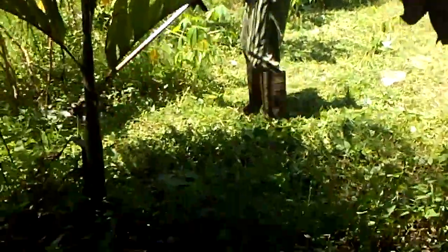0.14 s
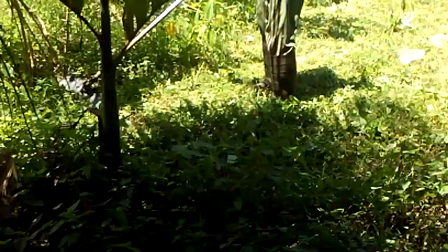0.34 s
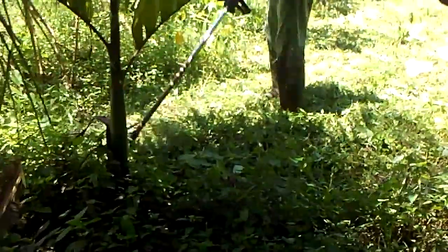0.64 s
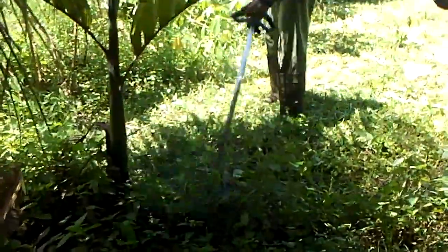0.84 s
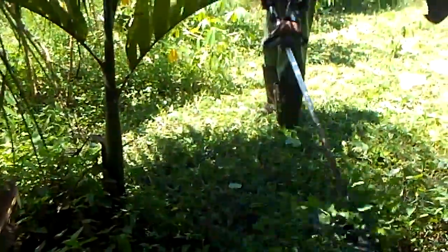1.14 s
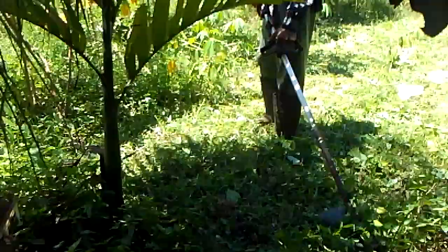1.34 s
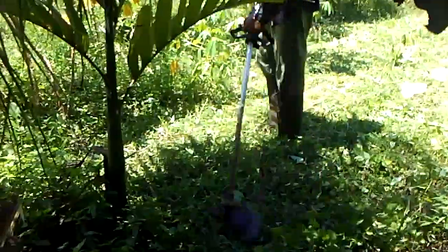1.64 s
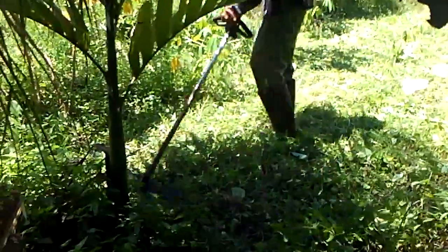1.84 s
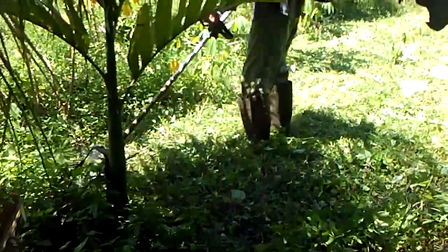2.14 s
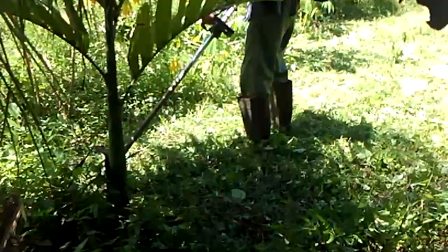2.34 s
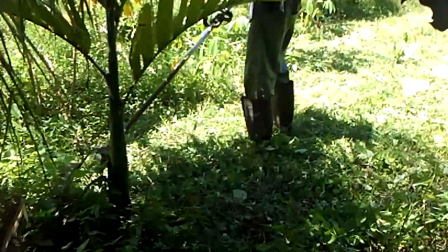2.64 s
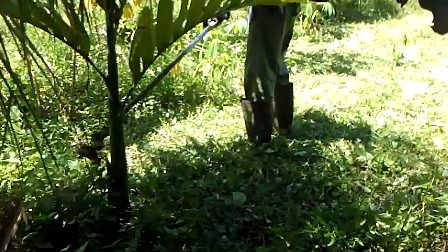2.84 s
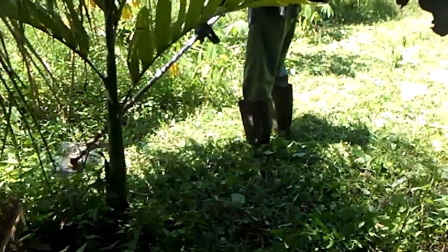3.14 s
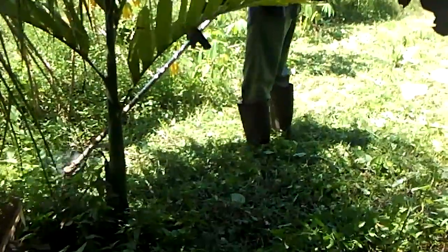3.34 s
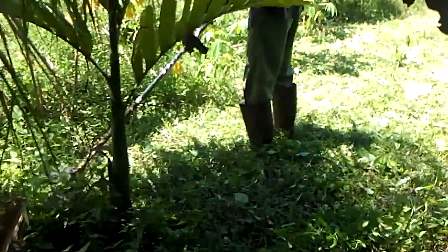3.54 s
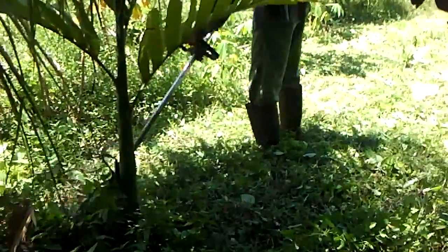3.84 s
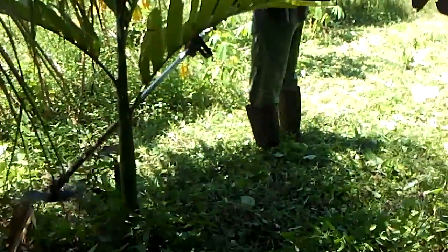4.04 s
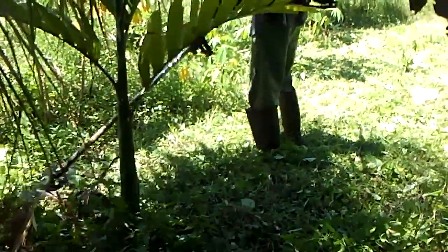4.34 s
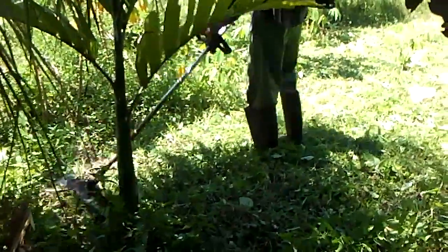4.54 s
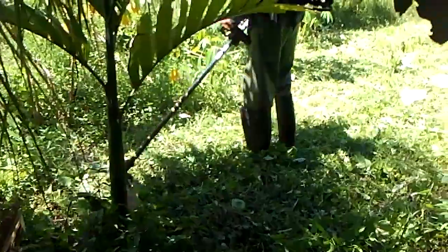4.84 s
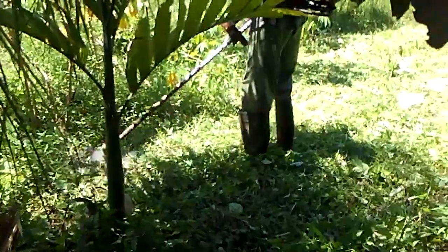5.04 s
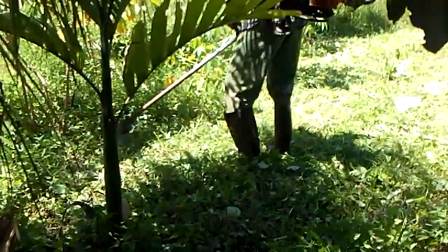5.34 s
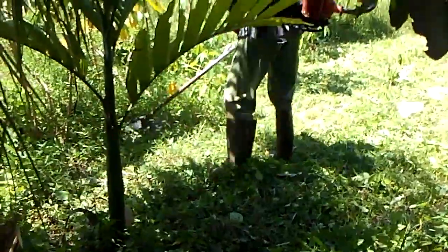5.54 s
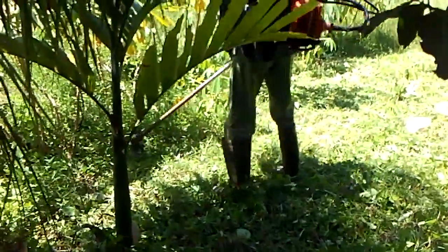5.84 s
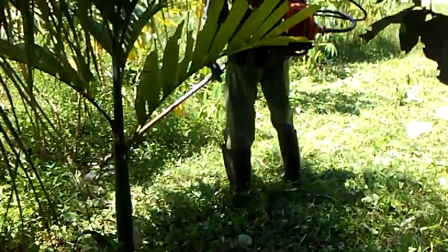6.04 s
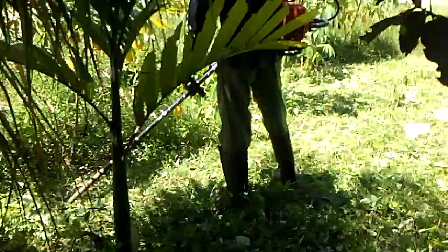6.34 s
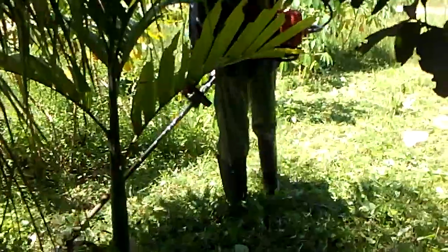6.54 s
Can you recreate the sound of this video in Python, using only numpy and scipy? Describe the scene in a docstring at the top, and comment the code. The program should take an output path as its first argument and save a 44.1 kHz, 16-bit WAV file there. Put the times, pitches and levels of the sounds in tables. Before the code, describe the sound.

A two-stroke petrol brush cutter runs throughout at part throttle, outdoors among weeds, a few metres from the microphone. The engine dominates with a buzzing, uneven putter, a raspy exhaust and a rattling casing. Beneath it the blade whirrs, shreds leaves and swishes through long grass with a faint steel ring. The pitch climbs slightly at first, then sags from about 1 to 1.8 seconds as a thick clump sets the blade ringing. The engine recovers, then falters briefly as the blade cracks into stalks at about 2.8 seconds. A smaller crack follows at 3.5 seconds, and a splintering cluster with a metallic ping and another stumble at 4 seconds. The engine labours at a lower pitch, with light pings around 4.5 and 5.2 seconds. It speeds up from about 5.7 seconds, shreds more leaves, and dips slightly at 6.5 seconds.

```python
"""Outdoors in weeds, one microphone a few metres from a two-stroke brush cutter. It opens at part
throttle, skipping every other firing; each turn puffs through the muffler and rattles the casing while
the blade whirrs and shreds leaves. After a second a thick clump sets the steel ringing, and the loaded
engine fires more often and unevenly. From about three to four seconds the blade hacks into stalks and
the engine falters. It labours on through thinner growth, then speeds up near the end."""
import sys
import numpy as np
from scipy import signal
from scipy.fft import rfft, irfft, next_fast_len
from scipy.io import wavfile
from scipy.ndimage import uniform_filter1d

SR = 44100
rng = np.random.default_rng(int(sys.argv[2]) if len(sys.argv) > 2 else 0)


def dump_mix(stems):
    """Bounce the given channels to the path in sys.argv[1] as a 16-bit WAV at rate SR."""
    frames = np.atleast_2d(stems).T  # one column per channel
    limited = np.clip(frames, -1, 1)  # hard clip at full scale
    pcm = np.round(limited * 32767).astype(np.int16)
    wavfile.write(sys.argv[1], SR, pcm)


N = 294588

# crank speed: t/s, speed/(turns/s)
CRANK_SPEED = [(0.0, 77.86), (0.04, 82.04), (0.16, 82.46), (0.2, 84.27), (0.36, 83.63), (0.48, 86.64),
               (0.64, 87.52), (0.8, 83.32), (1.04, 80.22), (1.08, 80.07), (1.28, 74.83), (1.44, 76.57),
               (1.68, 76.63), (1.72, 74.6), (1.92, 78.19), (2.08, 79.94), (2.2, 78.71), (2.4, 82.97),
               (2.44, 82.18), (2.6, 81.66), (2.64, 83.14), (2.76, 84.8), (2.84, 84.78), (2.96, 80.13),
               (3.04, 79.78), (3.2, 83.42), (3.32, 82.14), (3.52, 82.02), (3.64, 79.19), (3.84, 73.72),
               (3.88, 76.35), (4.0, 73.59), (4.04, 74.73), (4.08, 72.44), (4.16, 74.66), (4.44, 75.2),
               (4.56, 73.24), (4.6, 74.16), (4.68, 71.99), (4.92, 76.28), (5.08, 75.37), (5.2, 76.34),
               (5.32, 75.74), (5.36, 77.77), (5.56, 76.76), (5.72, 78.12), (5.84, 81.15), (6.0, 84.27),
               (6.08, 85.15), (6.2, 84.33), (6.24, 86.1), (6.4, 86.22), (6.52, 81.65), (6.68, 79.82)]
# firing rhythm, each stretch opening with a skip: t/s, skip spacing/turns
FIRING_RHYTHM = [(0.015, 3), (0.052, 2), (0.458, 3), (0.493, 5), (0.55, 2), (0.573, 4), (0.619, 3),
                 (0.653, 2), (0.676, 3), (0.711, 2), (0.758, 3), (0.867, 6), (0.94, 3), (1.051, 2),
                 (1.076, 3), (1.152, 2), (1.178, 3), (1.217, 4), (1.27, 3), (1.31, 6), (1.389, 2),
                 (1.415, 3), (1.455, 5), (1.52, 2), (1.572, 3), (1.65, 6), (1.73, 2), (1.835, 3),
                 (1.874, 2), (2.002, 3), (2.077, 2), (2.102, 3), (2.178, 2), (2.328, 3), (2.364, 2),
                 (2.413, 3), (2.522, 2), (2.571, 3), (2.608, 2), (2.751, 3), (2.787, 2), (2.81, 5),
                 (2.87, 3), (2.906, 2), (2.93, 3), (2.968, 2), (3.141, 3), (3.178, 2), (3.25, 3),
                 (3.286, 5), (3.347, 3), (3.384, 4), (3.432, 5), (3.493, 9), (3.604, 2), (3.629, 4),
                 (3.68, 2), (3.706, 8), (3.812, 3), (3.852, 2), (3.878, 3), (3.918, 6), (3.998, 2),
                 (4.053, 4), (4.107, 2), (4.188, 4), (4.241, 2), (4.268, 3), (4.308, 2), (4.362, 3),
                 (4.402, 2), (4.428, 3), (4.509, 6), (4.59, 2), (4.617, 5), (4.686, 2), (4.822, 5),
                 (4.889, 2), (5.231, 3), (5.271, 2), (6.03, 3), (6.065, 2), (6.112, 3), (6.183, 2),
                 (6.206, 3), (6.242, 2), (6.265, 4), (6.311, 2), (6.381, 3), (6.451, 2), (6.499, 6),
                 (6.573, 5)]
# hard firings of a rich charge: t/s, extra force/dB
RICH_FIRINGS = [(.545, 3.5), (.788, 1.5), (2.48, 1.5), (2.926, 3.5), (3.173, 3), (3.49, 4.5), (3.622, 0),
                (3.70, 4.5), (3.872, -1.5), (4.183, 7), (4.357, 4), (6.41, 4)]
# exhaust at the microphone as the operator turns: t/s, relative boom level/dB, bark level/dB
EXHAUST_LEVELS = [(0.0, -32, -24), (0.61, -29.5, -20), (0.89, -31, -23), (1.46, -24.5, -21),
                  (1.81, -26.5, -23), (1.96, -27, -21), (2.6, -30, -21), (3.5, -27.5, -21),
                  (3.86, -25.5, -21.5), (4.57, -23, -18.5), (4.68, -24.5, -20), (6.21, -26, -18),
                  (6.68, -27.5, -23)]
# fired against unfired turns, from smooth buzz to hard putter: t/s, contrast factor
PUTTER_CONTRAST = [(0, 1.4), (.9, 1.3), (1.2, 0.91), (1.45, .35), (1.72, 1), (1.95, 1.3), (2.7, 0.97),
                   (3.8, 0.75), (4.4, 0.76), (4.9, .9), (5.3, 1.1), (6.0, 0.59), (6.68, 0.61)]
# muffler response: f/Hz, gain/dB
MUFFLER_RESPONSE = [(85, -37), (150, -20), (258, -15.5), (292, -0.5), (335, 0.5), (380, 2), (455, -0.5),
                    (520, -4.5), (620, -3), (700, 0), (770, 1), (850, 1.5), (920, 3.5), (1000, -1.5),
                    (1100, -22), (1500, -31)]
# four crank speeds, laboured to racing: speed/(turns/s)
TUNING_SPEEDS = [74, 77, 82, 86]
# harmonics the muffler favours: engine order, relative level/dB at each of those speeds
ORDER_LEVELS = [(2, -31, -31, -31.5, -30.5), (3, -26.5, -27, -23.5, -23.5), (4, -17, -16, -15.5, -10.5),
                (5, -4.5, -4, -3, -3.5), (6, -6.5, -7, -9, -17.5), (7, -26, -18.5, -17.5, -14),
                (8, -26, -18, -23.5, -21.5), (9, -18, -14, -11, -5.5), (10, -11.5, -7.5, -2.5, -4.5),
                (11, -9.5, -8.5, -8, -17.5), (12, -6, -7, -12, -17), (13, -20.5, -12.5, -26.5, -23)]
# exhaust tone as the operator turns: t/s, gain between boom and bark/dB, gain at boom's lower edge/dB
FACING_GAINS = [(0, 7.5, -2.5), (.8, 2.5, -0.5), (1.5, 2, -3.5), (2.499, 2.5, -2), (4.5, 2, 0.5),
                (5.399, -5.5, -5.5), (5.7, -11, -1), (6.1, -7, 3.5), (6.68, -6, 5)]
# those two bands: low f/Hz, high f/Hz
FACING_BANDS = [(545, 700), (255, 325)]
# clatter, loudest with the engine facing the microphone: t/s, piston slap/dB, port knock/dB
CLATTER_LEVELS = [(0, -45, -41.5), (.3, -41.5, -36), (.55, -39, -49), (.85, -37, -45), (1.5, -35.5, -31.5),
                  (1.95, -38.5, -44.5), (2.65, -39.5, -41), (3.3, -40, -42), (3.7, -39, -43),
                  (4.3, -35.5, -50.5), (4.85, -40.5, -46.5), (5.3, -38, -47), (5.65, -41, -35),
                  (6, -32.5, -37), (6.35, -33, -40), (6.68, -41.5, -51)]
# casing modes under the piston's slap: f/Hz, width/Hz, relative level/dB
CASING_MODES = [(1310, 230, -1.5), (1593, 170, 4), (1737, 150, -1), (2010, 320, -8)]
# turbulent gas at the tailpipe: f/Hz, gain/dB
RASP_SPECTRUM = [(250, -9.5), (400, -3), (850, 1.5), (1150, 5.5), (1550, 0), (2000, -4), (2600, -11.5),
                 (3400, -17.5), (4300, -32), (5000, -40)]
# air stirred by the blade, loudest as it swings nearest the microphone: t/s, level/dB
WHIRR_LEVEL = [(0, -42), (.9, -43), (1.1, -37.5), (1.5, -36), (1.9, -42), (2.8, -42.5), (4, -42),
               (5.5, -50), (6.1, -41), (6.68, -41.5)]
# that stirred air: f/Hz, gain/dB
WHIRR_SPECTRUM = [(25, -29), (60, -28.5), (95, -13.5), (135, -2.5), (170, -2), (240, -6.5), (400, 0),
                  (800, -36)]
# growth the blade is taking, heard as flying clippings: t/s, relative level/dB
FEED_LEVEL = [(0.0, -57.5), (0.21, -69), (1.77, -59), (1.98, -68), (2.99, -71), (4.06, -65), (4.21, -75),
              (4.72, -72), (5.01, -77), (5.6, -70.5), (5.9, -68.5), (6.27, -61.5), (6.68, -68)]
# bites into clumps: t/s, length/s, extra shredding/dB, extra ring/dB
CLUMP_BITES = [(.98, 0.094, 6.5, 6), (1.11, 0.67, 0.5, 9), (0.02, 0.084, -3.5, 2), (2.865, 0.045, 13, 1),
               (3.46, 0.05, 11, 4), (3.99, 0.08, 4, 17), (6.38, 0.23, 4, 0)]
# shredding leaves: f/Hz, gain/dB
LEAF_SPECTRUM = [(1300, 2), (2000, 0.5), (2500, -1.5), (3300, -8), (4000, -15.5), (4500, -20.5),
                 (4950, -36.5), (6000, -48.5)]
# the steel blade's ring: f/Hz, gain/dB
STEEL_SPECTRUM = [(1550, -23), (1850, -4), (2030, 2), (2130, 0.5), (2250, -22.5), (2700, -34.5)]
# flying clippings: f/Hz, gain/dB
CLIPPING_SPECTRUM = [(4900, -37), (5150, -15), (5600, -4), (6600, -7), (7700, -10), (9000, -13.5),
                     (10500, -22), (12300, -44.5), (14500, -26), (15700, -25)]
# long grass along the blade: t/s, length/s, first f/Hz, last f/Hz, level/dB
GRASS_SWISHES = [(0.05, .31, 2130, 2560, -45.5), (0, 0.087, 1800, 3260, -50), (1.3, 0.13, 3500, 3160, -50),
                 (3.5, 0.082, 1900, 4200, -52), (0.99, 0.75, 2020, 2080, -46.5),
                 (0.85, 0.91, 3800, 3600, -56)]
# held rings after the blade touches something hard: t/s, length/s, f/Hz, level/dB
BLADE_PINGS = [(1.122, 0.2, 2037, -41), (1.359, 0.088, 2080, -39), (1.55, .13, 2084, -39),
               (3.974, .07, 1960, -36.5), (4.063, 0.054, 1860, -38), (4.3, 0.13, 2030, -44),
               (4.555, 0.2, 1600, -43), (4.567, 0.13, 3140, -58), (4.56, 0.18, 4450, -69),
               (5.226, 0.075, 2030, -42.5), (2.0, 4.7, 2034, -51)]
# the engine falters for a few turns: t/s, length/s, level change/dB
FALTERS = [(1.27, 0.088, -3), (2.78, 0.087, -7.5), (3.925, 0.058, -5.5), (4.0, .12, -2.5)]
# the blade skims stems: t/s, length/s, extra ringing/dB
STEM_GRAZES = [(1.6, 0.28, 13.5), (2.15, 0.82, 4.5), (3.08, 0.44, 8.5), (3.5, 0.56, 10), (4.22, .04, 10),
               (4.32, 0.067, 12), (4.44, 0.045, 14), (4.55, 0.27, 8.5), (6.14, 0.65, 8)]
# high blade modes: f/Hz, width/Hz, level/dB
HIGH_BLADE_MODES = [(3080, 96, -71), (4250, 110, -76), (4500, 290, -77.5), (6670, 430, -80.5),
                    (7400, 520, -83.5), (8880, 570, -88.5)]
# the blade hacks stalks: t/s, relative level/dB
STALK_HACKS = [(2.82, -22.5), (2.827, -16.5), (2.836, -23.5), (2.869, -20.5), (2.879, -14.5),
               (2.889, -25.5), (2.934, -18), (3.494, -22), (3.992, -15.5), (4.018, -23), (4.0337, -21.5),
               (4.041, -17), (4.055, -16.5), (4.082, -20.5), (4.0987, -22.5)]
# a cracking stalk: f/Hz, gain/dB
STALK_SPECTRUM = [(300, -15), (700, -9.5), (1100, 6), (1400, 3), (1900, 1.5), (2400, -4.5), (3200, -11.5),
                  (4300, -22), (5100, -35.5), (6600, -31.5), (10000, -50.5), (13000, -64.5)]
# low blade modes, rung by a stalk: f/Hz, width/Hz, gain/dB
LOW_BLADE_MODES = [(1890, 45, -3), (1960, 50, -5), (2180, 70, -2.5)]


def from_db(db):
    return 10 ** (np.asarray(db) / 20)


def rms_one(x):
    return x / np.sqrt(np.mean(x ** 2) + 1e-20)


def steady(x, samples=4400):
    """Hold the slow level at rms 1, keeping the single beats."""
    power = uniform_filter1d(uniform_filter1d(x ** 2, samples), samples // 2)
    return x / np.sqrt(np.abs(power) + 1e-20)


def flutter(samples=2400):
    """A quick random waver; rms 1."""
    return rms_one(uniform_filter1d(uniform_filter1d(rng.standard_normal(N), samples), samples // 2))


def curves(rows, at=None):
    """A table's columns at given times, or at every sample."""
    s, *columns = np.transpose(rows)
    return [np.interp(np.arange(N) / SR if at is None else at, s, c) for c in columns]


def swell(start_s, length_s, edge_s):
    """A gate that rises, holds and falls back."""
    t = np.arange(N) / SR
    return np.clip(.5 + np.minimum(t - start_s, start_s + length_s - t) / edge_s, 0, 1)


def spells(rows, edge_s):
    """One dB curve per level column, with a swell for each row."""
    return sum(np.outer(levels_db, swell(s, length, edge_s)) for s, length, *levels_db in rows)


def colour(x, spectrum):
    """Minimum-phase filter, falling 20 dB an octave beyond the spectrum's ends."""
    size = 2 * next_fast_len(N // 2 + 4096)
    octave = np.log2(np.maximum(np.fft.rfftfreq(size, 1 / SR), 10))
    hz, db = np.transpose(spectrum)
    beyond = np.abs(octave - np.clip(octave, np.log2(hz[0]), np.log2(hz[-1])))
    gain = from_db(np.interp(octave, np.log2(hz), db) - 20 * beyond)
    cepstrum = irfft(np.log(gain))
    cepstrum[1:size // 2] *= 2
    cepstrum[size // 2 + 1:] = 0
    return irfft(rfft(x, size) * np.exp(rfft(cepstrum)))[:N]


def butter(order, hz, kind="low"):
    return signal.butter(order, hz, kind, fs=SR, output="sos")


def resonate(x, hz, width_hz):
    """One resonance with peak gain 1."""
    r = np.exp(-np.pi * width_hz / SR)
    feedback = [1, -2 * r * np.cos(2 * np.pi * hz / SR), r * r]
    return signal.lfilter(np.array([1, 0, -1]) * (1 - r * r) / 2, feedback, x + 1e-18)


def resonate_twice(x, hz, width_hz):
    return resonate(resonate(x, hz, width_hz), hz, width_hz)


def clicks(times, sizes):
    """Impulses placed between samples."""
    at = np.clip(times * SR, 0, None)
    i, part = at.astype(int), at % 1
    return np.bincount(i, sizes * (1 - part), N)[:N] + np.bincount(i + 1, sizes * part, N)[:N]


def fade(x, decay_s):
    """Each impulse becomes an exponential decay."""
    return signal.lfilter([1], [1, -np.exp(-1 / (decay_s * SR))], x + 1e-18)


def grains(per_s, spread_db):
    """Random tiny snaps of uneven size; rms 1."""
    sizes = from_db(spread_db * np.minimum(rng.exponential(1, N), 4)) * rng.choice([-1, 1], N)
    return rms_one(sizes * (rng.random(N) < per_s / SR))


def foliage(x, level_db, decay_s=0.0058, rise_s=0.0065):
    """Leaves and stems scatter a short diffuse tail towards the microphone."""
    t = np.arange(4000) / SR
    tail = rng.standard_normal(len(t)) * np.exp(-t / decay_s) * (1 - np.exp(-(t / rise_s) ** 2))
    return x + from_db(level_db) * signal.fftconvolve(x, tail / np.linalg.norm(tail))[:N]


def combustion(times, refill_db=1.5, weak_burn_db=-2.5, stumble_db=1.1, stumble_s=.00009):
    """Which turns skip, how hard and late the rest fire: a skip freshens the charge, long runs stumble."""
    start_s, spacings = np.transpose(FIRING_RHYTHM)
    stretch = np.maximum(np.searchsorted(start_s, times) - 1, 0)
    spacing = spacings[stretch]
    since_skip = (np.arange(len(times)) - np.searchsorted(times, start_s)[stretch]) % spacing
    skipped = since_skip == 0
    triple = spacing == 3  # here the charge first burns weakly, then fully
    force_db = refill_db * (since_skip == 1 + triple) + weak_burn_db * (triple & (since_skip == 1))
    unsteady = np.interp(spacing, [2, 3, 5], [.25, .55, 1])
    force_jitter, time_jitter = unsteady * rng.standard_normal((len(times), 2)).T
    force_db += stumble_db * force_jitter
    for s, extra_db in RICH_FIRINGS:
        turn = np.argmin(np.abs(times - s))
        skipped[turn] = False
        force_db[turn] += extra_db
    return skipped, force_db, stumble_s * time_jitter


def exhaust(times, skipped, force_db, scavenge_s=.0024, intake_lead_s=0.00454, split_hz=570):
    """The port opens once a turn: burnt gas booms, fresh charge follows; an unfired puff still barks."""
    boom_db, bark_db = curves(EXHAUST_LEVELS)
    contrast, = curves(PUTTER_CONTRAST, times)
    boom_times = times + 0.0001
    blowdown = clicks(boom_times, from_db(contrast * (force_db - 10 * skipped)))
    scavenge = clicks(boom_times + scavenge_s, from_db(-5))
    intake = clicks(times - intake_lead_s, from_db(-11))  # air gulped at the carburettor
    puffs = clicks(times, from_db(contrast * (0.95 * force_db - 2.8 * skipped)))
    boom = colour(blowdown + scavenge, MUFFLER_RESPONSE)
    bark = colour(intake + puffs, MUFFLER_RESPONSE)
    low_pass = butter(4, split_hz)
    boom = foliage(signal.sosfiltfilt(low_pass, boom, padtype=None), level_db=-2.5)
    bark = foliage(bark - signal.sosfiltfilt(low_pass, bark, padtype=None), level_db=-3.5)
    return from_db(boom_db + 4.5) * steady(boom) + from_db(bark_db) * steady(bark)


def muffler_tuning(x, turns, speed, lowest_bark_order=8, lift_db=1.5, waver_db=1.0, samples=2800):
    """Crank speed sets how strongly each order sounds through the muffler, in step with the puffs."""
    boom_db, bark_db = curves(EXHAUST_LEVELS)
    for order, *levels_db in ORDER_LEVELS:
        band_db = boom_db if order < lowest_bark_order else bark_db
        level_db = band_db + np.interp(speed, TUNING_SPEEDS, levels_db) + lift_db
        height = from_db(level_db + waver_db * flutter()) / np.sqrt(2)
        # draw this harmonic towards that height, keeping its phase
        spin = np.exp(2j * np.pi * order * turns)
        present = uniform_filter1d(uniform_filter1d(x / spin, samples), samples)
        wanted = height * present / np.hypot(np.abs(present), .25 * height)
        x = x + 2 * np.real((wanted - present) * spin)
    return x


def operator_turning(x):
    """The bands either side of the boom rise and sink at the microphone as the operator turns."""
    for gain_db, edges_hz in zip(curves(FACING_GAINS), FACING_BANDS):
        band = signal.sosfiltfilt(butter(2, edges_hz, "band"), x, padtype=None)
        x = x + (from_db(gain_db) - 1) * band
    return x


def casing(times, slap_turns=.615, port_lead_s=.0013, port_pitch=0.936, spread_db=2.0, loose_s=1e-5):
    """Two blows a turn ring the casing: the piston's crisp slap and a duller knock as the port opens."""
    slap_jitter, slap_force, port_jitter, port_force = rng.standard_normal((len(times), 4)).T
    slap_db, port_db = curves(CLATTER_LEVELS)
    slap_times = times + slap_turns * np.gradient(times)
    slap = clicks(slap_times + loose_s * slap_jitter, from_db(spread_db * slap_force))
    port = clicks(times - port_lead_s + loose_s * port_jitter, from_db(spread_db * port_force))
    soft_contact = butter(4, hz=2400)
    out = 0
    for blows, level_db, pitch in ((slap, slap_db, 1), (port, port_db, port_pitch)):
        rings = sum((-1) ** k * from_db(db) * resonate(blows, pitch * hz, width)
                    for k, (hz, width, db) in enumerate(CASING_MODES))
        clatter = foliage(signal.sosfilt(soft_contact, rings), level_db=-9.5)
        out += from_db(level_db) * steady(clatter)
    return out


def gas_rasp(times, burn, lag_s=0.003012, level_db=-39):
    """A spit of turbulent gas leaves the tailpipe after each fired puff, over a faint steady flow."""
    flow = 0.058 + fade(clicks(times + lag_s, burn), decay_s=0.0049)
    return from_db(level_db) * steady(colour(flow * rng.standard_normal(N), RASP_SPECTRUM))


def crank_hum(turns, level_db=-55):
    """The crank's unbalance shakes the engine once a turn."""
    return from_db(level_db) * np.sin(2 * np.pi * turns)


def whirr():
    """The blade stirs the air, louder as it swings towards the microphone."""
    level_db, = curves(WHIRR_LEVEL)
    return from_db(level_db) * steady(colour(rng.standard_normal(N), WHIRR_SPECTRUM))


def shredding(turns, gear_ratio=0.52, usual_feed_db=-68):
    """The two blade tips shred leaves; the snaps ring the steel and fling clippings."""
    feed_db, = curves(FEED_LEVEL)
    bite_db, bite_ring_db = spells(CLUMP_BITES, edge_s=0.081)
    heavier_db = feed_db - usual_feed_db
    tips_passing = 1 + 0.057 * np.cos(4 * np.pi * gear_ratio * turns)
    snaps = tips_passing * (grains(per_s=3300, spread_db=0.5) + 0.5 * rng.standard_normal(N))
    leaves = from_db(-44 + 0.53 * heavier_db + bite_db) * steady(colour(snaps, LEAF_SPECTRUM))
    steel = from_db(-53.5 + 0.25 * heavier_db + bite_ring_db) * steady(colour(snaps, STEEL_SPECTRUM))
    clippings = from_db(feed_db - 1.5 + 0.94 * bite_db) * steady(colour(snaps, CLIPPING_SPECTRUM))
    return leaves + steel + clippings


def swishes(width_hz=420):
    """Long grass scrapes along the blade: a band of rustle that glides as the stems are drawn tight."""
    t, out = np.arange(N) / SR, 0
    for s, length, first_hz, last_hz, db in GRASS_SWISHES:
        snaps = grains(per_s=1500, spread_db=1.0)
        rustle = rms_one(signal.sosfilt(butter(2, width_hz / 2), snaps + 1e-18))
        centre_hz = np.interp(t, [s, s + length], [first_hz, last_hz])
        glide = np.sqrt(2) * np.cos(2 * np.pi * np.cumsum(centre_hz) / SR)
        out += from_db(db) * swell(s, length, edge_s=0.066) * rustle * glide
    return out


def pings(width_hz=45):
    """Touching something hard, one mode of the blade swells and sings."""
    out = 0
    for s, length, hz, db in BLADE_PINGS:
        ring = steady(resonate_twice(rng.standard_normal(N), hz, width_hz), samples=2200)
        out += from_db(db) * ring * swell(s, length, edge_s=.03)
    return out


def grazes(waver_db=2.0):
    """The blade's edge skims stems and its high modes ring, each wavering by itself."""
    extra_db, = spells(STEM_GRAZES, edge_s=0.027)
    snaps = grains(per_s=1500, spread_db=3.0)
    rings = sum(from_db(db + waver_db * flutter()) * rms_one(resonate_twice(snaps, hz, width))
                for hz, width, db in HIGH_BLADE_MODES)
    return from_db(extra_db) * rings


def hacks(splinters=5, gap_s=0.012, step_db=-5, trim_db=-8):
    """A stalk cracks, splinters in a dying run of ticks and sets the blade ringing."""
    s, level_db = np.transpose(STALK_HACKS)
    gaps = gap_s * (.5 + rng.random((len(s), splinters)))
    times = s[:, None] + np.cumsum(gaps, axis=1) - gaps
    sizes = from_db(level_db[:, None] + trim_db + step_db * np.arange(splinters))
    bursts = fade(clicks(times.ravel(), sizes.ravel()), decay_s=0.0039)
    crack = colour(bursts * rng.standard_normal(N), STALK_SPECTRUM)
    crack /= np.std(colour(rng.standard_normal(N), STALK_SPECTRUM))  # unit filter gain for noise
    ring = sum(from_db(db) * resonate(crack, hz, width) for hz, width, db in LOW_BLADE_MODES)
    return foliage(crack, level_db=-9) + ring


def scene(muffler_lag_s=.0007, uneven_growth_db=1.0):
    """Engine, blade and stalks, from one spot in the open a few metres off."""
    speed = uniform_filter1d(curves(CRANK_SPEED)[0], size=3000)  # the flywheel rounds every change
    turns = np.cumsum(speed) / SR + 1 / 3
    times = np.interp(np.arange(1, int(turns[-1])), turns, np.arange(N) / SR)  # one per whole turn
    skipped, force_db, late_s = combustion(times)
    times += late_s
    burn = from_db(force_db) * ~skipped
    falter_db, = spells(FALTERS, edge_s=0.028)
    puffs = exhaust(times + muffler_lag_s, skipped, force_db)
    muffler = operator_turning(muffler_tuning(puffs, turns, speed))
    machine = from_db(falter_db) * (muffler + casing(times) + gas_rasp(times, burn) + whirr())
    cutting_db = 0.51 * falter_db + uneven_growth_db * flutter()
    cutting = from_db(cutting_db) * (shredding(turns) + grazes() + swishes() + pings())
    return (machine + crank_hum(turns) + cutting + hacks())[None]


def record(dry, ceiling=0.7, low_cut_hz=38, top_hz=15760):
    """One microphone: the hardest firings slightly rounded, deep bass rolled off, the top cut steeply."""
    rounded = dry / (1 + (dry / ceiling) ** 6) ** (1 / 6)
    bass_cut = signal.sosfilt(butter(1, low_cut_hz, "high"), rounded)
    return signal.sosfilt(signal.ellip(10, .1, 80, top_hz, fs=SR, output="sos"), bass_cut)


dry = scene()
out = record(dry)
dump_mix(out)
```